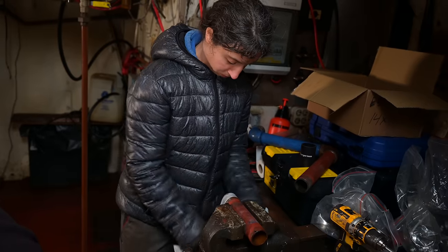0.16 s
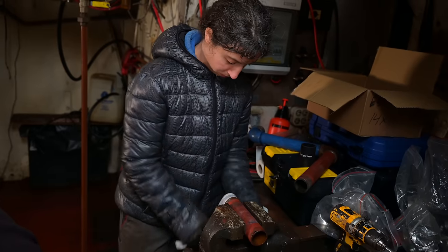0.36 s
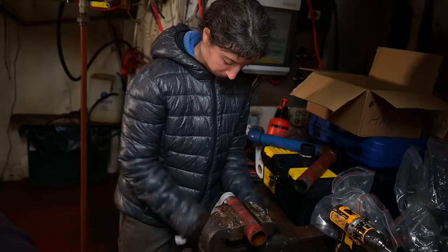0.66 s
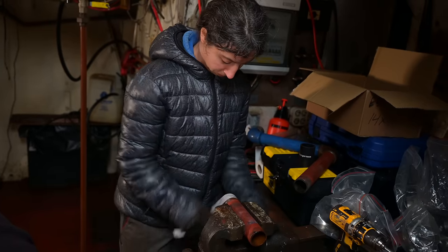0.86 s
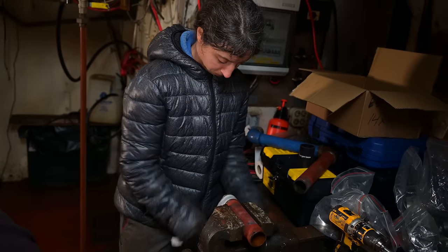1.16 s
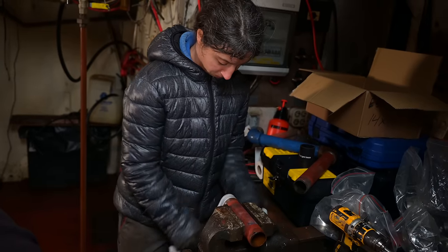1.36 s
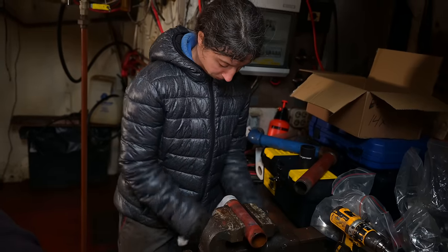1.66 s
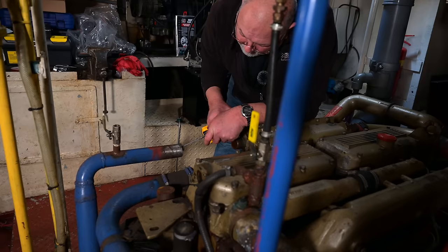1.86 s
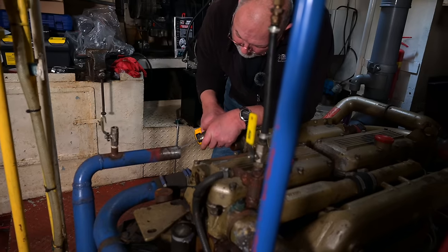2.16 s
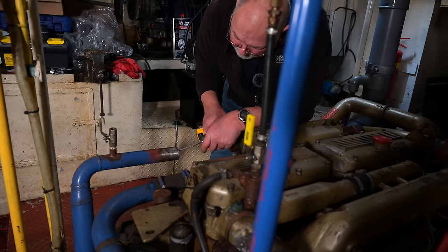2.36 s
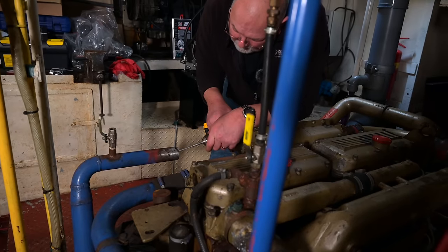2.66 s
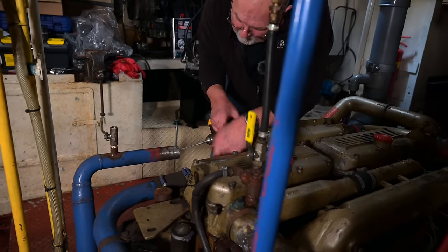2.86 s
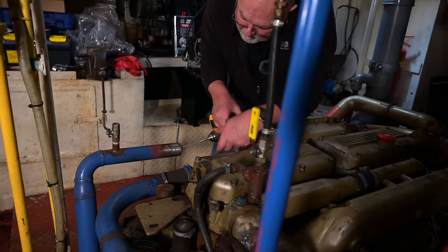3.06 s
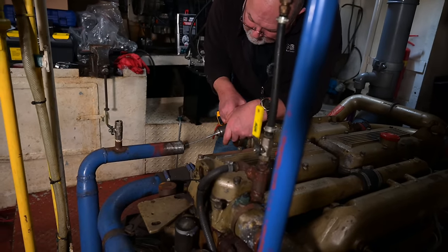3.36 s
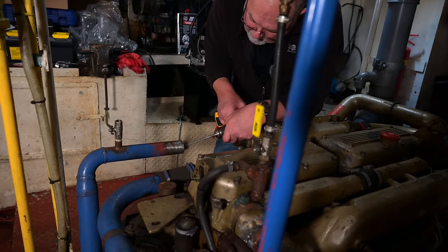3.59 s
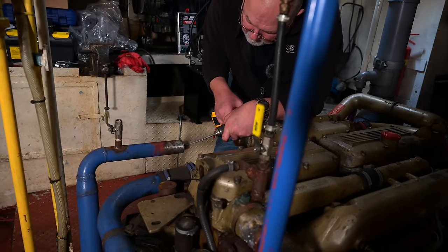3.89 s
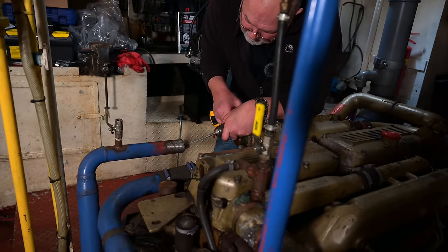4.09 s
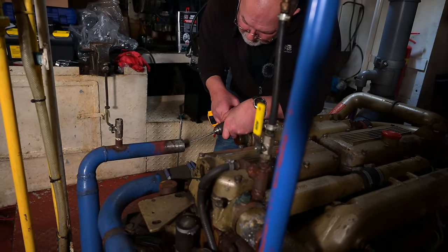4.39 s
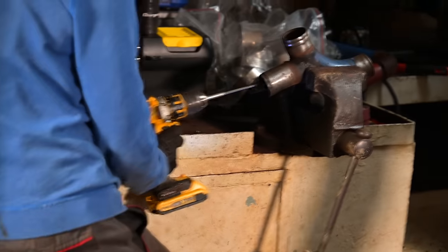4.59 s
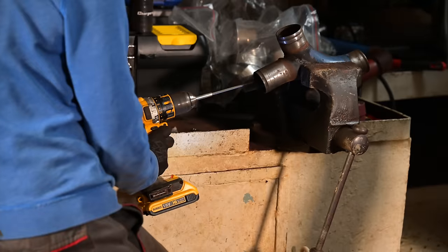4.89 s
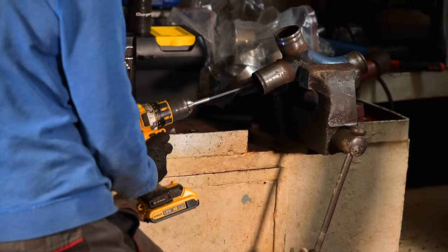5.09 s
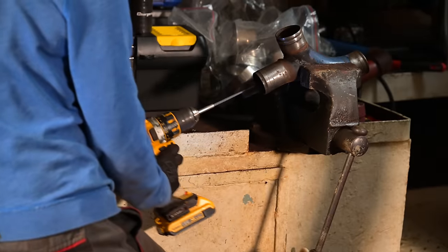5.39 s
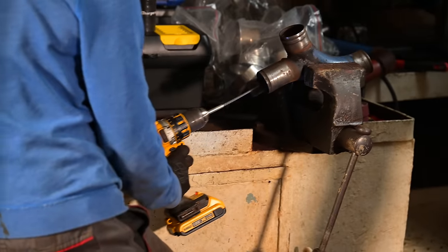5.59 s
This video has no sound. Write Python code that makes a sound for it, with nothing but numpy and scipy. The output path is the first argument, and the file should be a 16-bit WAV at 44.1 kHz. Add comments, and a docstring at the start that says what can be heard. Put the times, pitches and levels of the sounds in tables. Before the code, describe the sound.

From 0 to about 1.8 s, an abrasive pad scours a metal pipe by hand: nine quick, gritty strokes, roughly five a second, each starting and stopping sharply. Some catch with a harder scratch, around 0.3 s especially; the stroke near 0.9 s is brighter. Soft sleeve rustle fills the gaps, with very faint thin squeals and a dull, quiet knock at 0.6 s. At about 1.85 s a cordless drill cuts in, louder, its wire brush hissing brightly inside a pipe, fluttering rapidly with each turn over motor whine and gear rattle. Speed wavers slightly, then sags from 4.2 to 4.6 s as the hiss surges, duller and rougher, peaking near 4.5 s. Gear rattle swells around 4.9 s. The loaded drill drops away by 5.2 s, while a steadier, softer drill, faded in from 4.5 s, whirs on more distantly to the end. Quiet workshop room noise continues throughout, in centred mono.

```python
"""Scrubbing and drilling in a workshop

An abrasive pad scrubs a metal pipe in quick strokes: bursts of shaped noise, with thin squeals and a dull knock.
Then a cordless drill spins a wire brush inside a pipe, slowing under load: tones tied to rotor speed, plus hiss.
It fades into a second, steadier drill further off, made of noise and tones. Room noise lies under everything.
Both channels are the same.
"""
import sys
import numpy as np
from scipy import signal
from scipy.fft import rfft, irfft, next_fast_len
from scipy.io import wavfile
from scipy.ndimage import uniform_filter1d, map_coordinates

SR = 44100
rng = np.random.default_rng(int(sys.argv[2]) if len(sys.argv) > 2 else 0)


def log_audio(samples):
    """Write samples as a 16-bit WAV file to the path given in sys.argv[1]."""
    # one column per channel
    frames = np.atleast_2d(samples).T
    # limit to full scale, then quantise
    limited = np.clip(frames, -1, 1)
    pcm = np.round(limited * 32767).astype(np.int16)
    wavfile.write(sys.argv[1], SR, pcm)


N = 253134  # length in samples
T = np.arange(N) / SR  # time of each sample, s
GEARING = 12.57  # rotor turns per chuck turn, in both drills


def amp(db):
    """Turn decibels into a plain multiplier."""
    return 10 ** (np.asarray(db) / 20)


def unit(x):
    """Scale a sound to an rms level of 1."""
    return x / np.sqrt(np.mean(x ** 2) + 1e-20)


def along(points, hz):
    """Read a curve of (Hz, value) points, joined by straight lines on a log pitch axis."""
    f, v = np.transpose(points)
    return np.interp(np.log(hz + 1), np.log(f + 1), v)


def curves(rows, t=T):
    """Read a table over time: one curve for each column after the first."""
    s, *cols = np.transpose(rows)
    return [np.interp(t, s, c) for c in cols]


def gate(rows, fade):
    """1 while a table lasts, fading to 0 at its ends over `fade` seconds."""
    return np.clip(np.minimum(T - rows[0][0], rows[-1][0] - T) / fade, 0, 1)


def swell(s, width, db):
    """A bell-shaped rise (or dip, if db is negative) around time s."""
    return db * np.exp(-((T - s) / width) ** 2)


def wobble(rate):
    """A smooth random curve through `rate` random points a second."""
    return map_coordinates(rng.standard_normal(int(N * rate / SR) + 4), [T * rate])


def shaped(x, gain_db, patchy_db):
    """Filter x by a gain that varies with pitch and time, keep each moment's power, then add random patches."""
    hz, t, z = signal.stft(x, SR, nperseg=256)
    patches = uniform_filter1d(rng.standard_normal(z.shape), 3, 0)
    patches = uniform_filter1d(patches, 24, 1)
    gain = amp(gain_db(hz[:, None], t)) * np.ones(z.shape)
    gain = gain / np.sqrt(np.mean(gain ** 2, axis=0))
    z = z * gain * amp(patchy_db * unit(patches))
    return unit(signal.istft(z, SR, nperseg=256)[1][:N])


def coloured(x, response):
    """Filter x by a fixed response over frequency."""
    m = next_fast_len(N + 8192)
    return irfft(rfft(x, m) * response(np.fft.rfftfreq(m, 1 / SR)), m)[:N]


def grit(spread_db):
    """Dense scratches of unequal size: noise whose level jitters quickly."""
    return unit(rng.standard_normal(N) * amp(spread_db * wobble(900)))


def tone(hz, blur_hz):
    """A sine of rms 1 whose pitch trembles."""
    trembling_hz = hz + blur_hz * wobble(60)
    phase = 2 * np.pi * np.cumsum(trembling_hz) / SR
    return np.sqrt(2) * np.sin(phase + rng.uniform(0, 2 * np.pi))


# Hand strokes, before a random tremble in level: start_s, end_s, starting_level_db, loudest_s, loudest_level_db,
# closing_level_db, brightness_db, sleeve_rustle_after_db
HAND_STROKES = [(.075, .197, -44.5, .17, -38, -40, -4.5, -58.5),
                (0.266, .421, -49, .35, -36, -46.5, -2.5, -53),
                (.501, .605, -44.5, .57, -35, -40.5, 1.5, -50), (0.67, 0.817, -45, .77, -37, -52, -.5, -60),
                (0.877, .988, -47.5, .93, -34, -33.5, 6.5, -54),
                (1.06, 1.184, -39.5, 1.11, -37, -36.5, -1.5, -54.5),
                (1.237, 1.378, -53, 1.3, -34.5, -37.5, 2, -50.5),
                (1.433, 1.564, -39.5, 1.55, -36, -36.5, -4.5, -46),
                (1.63, 1.779, -53, 1.68, -35.5, -37, 1, -50)]
# Moments when the pad catches on the pipe: start_s, length_s, level_db
PAD_CATCHES = [(0.307, 0.011, -34.5), (0.323, 0.013, -29.5), (.5, .004, -38), (0.711, 0.021, -34.5),
               (0.97, 0.015, -43), (1.11, 0.029, -35.5), (1.156, 0.0075, -38)]
# Basic colour of the pad's grit: pitch_hz, relative_level_db (per Hz)
PAD_COLOUR = [(410, -31.5), (700, -25), (1180, -18), (1840, -17), (2990, -9), (3780, -4.5), (4140, -8.5),
              (7850, -2), (13800, -5), (15900, -12.5)]
# Low rasp of the pad: it grows with time and weakens as a stroke gets brighter
RASP_DB, RASP_GROWS_DB_PER_S, RASP_PER_BRIGHTNESS = 0, 2.5, -0.33
FIRST_RUSTLE_DB, SLEEVE_ENDS_S = -49.5, 1.85


def scrubbing():
    """Grit of the pad rasps along the pipe, starting and stopping sharply; where it catches the rasp jumps."""
    _, end, _, top, _, _, bright_db, rustle_db = np.transpose(HAND_STROKES)

    def colour(hz, t):
        high = np.clip(np.log2((hz + 1) / 7000), 0, 1)
        low = np.clip(np.log2(3500 / (hz + 1)), 0, 1)
        bright = np.interp(t, top, bright_db)
        rasp_db = RASP_DB + RASP_GROWS_DB_PER_S * t + RASP_PER_BRIGHTNESS * bright
        return along(PAD_COLOUR, hz) + high * bright + low * rasp_db

    def cloth(hz, t):
        # the pad's colour, losing 3 dB more per octave above 1500 Hz
        return along(PAD_COLOUR, hz) - 3 * np.log2(np.maximum(hz, 1500) / 4000)

    level = np.zeros(N)
    for start_s, end_s, start_db, top_s, top_db, close_db, _, _ in HAND_STROKES:
        pressure = amp(np.interp(T, (start_s, top_s, end_s), (start_db, top_db, close_db)))
        onset = np.clip((T - start_s) / 0.0055, 0, 1)
        release = amp(-60 * np.maximum(T - end_s, 0) / 0.068)
        level += pressure * onset * release
    level = level * amp(0.72 * wobble(69.7))
    for s, length, db in PAD_CATCHES:
        catch = np.clip(np.minimum((T - s) / 0.0041, (s + length - T) / 0.0011), 0, 1)
        level = level + amp(db) * catch

    sleeve_db = np.interp(T, np.r_[0, end + .04], np.r_[FIRST_RUSTLE_DB, rustle_db])
    rustle = amp(sleeve_db + 1.3 * wobble(40.8)) * np.clip((SLEEVE_ENDS_S - T) / 0.057, 0, 1)
    rasp = level * shaped(grit(2.1), colour, patchy_db=1.9)
    return rasp + rustle * shaped(grit(1.2), cloth, patchy_db=1.2)


# Speed and whine of the loaded drill: time_s, rotor_hz (turns per second), whine_db (8th order, before a tremble)
ROTOR_SPEED = [(1.78, 405.6, -43), (1.9, 400.2, -42), (2.1, 393, -43), (2.25, 402.2, -47.5),
               (2.45, 407, -45.5), (2.75, 394.2, -38), (2.92, 386, -51), (3.08, 397.6, -51),
               (3.3, 401, -42), (3.6, 402.9, -40.5), (3.78, 389.1, -38.5), (4.06, 402.3, -41),
               (4.2, 394.3, -40.5), (4.45, 368.5, -44.5), (4.63, 347.7, -47.5), (4.78, 360.4, -45.5),
               (4.95, 375.4, -48), (5.2, 366, -50)]
# Wire brush on the wall: time_s, hiss_db (before a 1.5 dB boost and the throb), bright_resonance_hz
WIRE_BRUSH = [(1.78, -42, 6700), (1.94, -31.5, 6890), (2.3, -32, 7200), (2.6, -33, 7300),
              (2.85, -33.5, 6070), (3.04, -36, 6500), (3.5, -32.5, 7300), (4.05, -32.5, 6850),
              (4.28, -32, 6290), (4.34, -30.5, 5430), (4.47, -27.5, 5470), (4.62, -31, 5480),
              (4.9, -32, 5600), (5.08, -39, 5784), (5.17, -46, 5810)]
# Basic colour of the bristle hiss: pitch_hz, relative_level_db (per Hz)
BRISTLE_COLOUR = [(60, -73), (200, -18.5), (500, -10.5), (850, -13), (1250, -6.5), (1800, -7), (2200, -6),
                  (3600, -2.5), (5300, -3.5), (6300, -1.5), (7500, -0.5), (9200, -7), (11200, -8.5),
                  (12800, -9), (15900, -12)]
# Resonances of the air column in the pipe: pitch_hz, width_hz, relative_level_db
PIPE_AIR = [(1377, 140, 0), (2150, 230, -3)]
# Chuck tones: multiple (of the chuck's turning rate), level_db (over the shake level, before a tremble)
CHUCK_ORDERS = [(3, -18), (4, -3), (5, 0), (6, -2)]
# Higher rotor tones: multiple (of rotor_hz), level_db (over the whine, before a tremble)
HIGH_ROTOR_ORDERS = [(16, -9), (21, -12)]
# Further overtones of the gear mesh. Key: multiple; values: level_db (over the 3rd, before a tremble), blur_hz
MESH_OVERTONES = {2: (-7.5, 60), 4: (-0.5, 160), 5: (-7, 210)}
# Changes in the gear rattle: time_s, width_s, mesh_gain_db, third_overtone_gain_db
GEAR_RATTLES = [(2.03, .27, 4, 9.5), (3.55, .35, -2, 5.5), (4.86, .34, 16.5, 9)]
# The chuck shakes the pipe harder or less: time_s, width_s, gain_db
CHUCK_SHUDDERS = [(3.1, 0.23, 8), (3.9, .3, 5), (4.9, .4, -8)]
MESH = 3.77  # gear teeth meeting per rotor turn
PRESS_AT = 4.891  # one of the once-per-turn presses peaks near this moment, s; it sets the timing of the others
FADE_IN_S, RISE_DB_PER_S, FADE_OUT_S, FALL_DB_PER_S = 1.87, 110, 5.07, 130  # for the drill's tones and drone
HUM_DB, HUM_GROWS_DB_PER_S = -58, 1.6  # hum level at the fade-in time, and its growth
FOURTH_DB, MESH_DB, THIRD_DB = -53, -57.5, -53  # base levels: 4th rotor order, gear mesh, its 3rd overtone
# Lift of the bright resonance: it grows with the hiss and jumps once the brush is deep in
LIFT_DB, LIFT_PER_DB, DEEP_S, DEEP_LIFT_DB, DEEP_FALLS_DB_PER_S = 3, 1.1, 4.31, 8, 4
TREBLE_DB, TREBLE_PER_DB, TREBLE_FALLS_DB_PER_S = 3, 0.67, 1.4
DRONE_DB, DRONE_GROWS_DB_PER_S = -50, 2  # base level at the fade-in time, and its growth
SHAKE_DB = -71  # base level of the chuck tones


def loaded_drill():
    """Rotor and gear tones follow the speed; the off-centre brush presses the wall once per chuck turn."""
    hz, whine_db = curves(ROTOR_SPEED)
    hiss_db, _ = curves(WIRE_BRUSH)
    since = T - FADE_IN_S
    fade = amp(RISE_DB_PER_S * np.minimum(since, 0) - FALL_DB_PER_S * np.maximum(T - FADE_OUT_S, 0))
    turn = 2 * np.pi * np.cumsum(hz / GEARING) / SR
    press = np.cos(turn - turn[round(PRESS_AT * SR)] + .25 * wobble(9.5))
    bite = unit(amp(9.9 * press))  # the teeth load up in a short burst each turn

    def colour(f, t):
        level_db, centre_hz = curves(WIRE_BRUSH, t)
        force_db = np.maximum(level_db + 33, -4)
        deep = np.clip((t - DEEP_S) / .03, 0, 1)
        deep_db = (DEEP_LIFT_DB - DEEP_FALLS_DB_PER_S * (t - DEEP_S)) * deep
        lift_db = LIFT_DB + LIFT_PER_DB * force_db + deep_db
        resonance = np.exp(-((f - centre_hz) / 650) ** 2)
        treble_db = TREBLE_DB + TREBLE_PER_DB * force_db - TREBLE_FALLS_DB_PER_S * (t - FADE_IN_S)
        high = np.clip(np.log2((f + 1) / 7000), 0, 1)
        return along(BRISTLE_COLOUR, f) + lift_db * resonance + treble_db * high

    def column(f):
        return sum(amp(db) * 1j * f * w / (c * c - f * f + 1j * f * w) for c, w, db in PIPE_AIR)

    # the hiss throbs with each press, more strongly around the last rattle
    throb_db = (0.7 + swell(GEAR_RATTLES[-1][0], .3, 1.2)) * press
    hiss = amp(hiss_db + 1.5 + throb_db) * shaped(grit(1.18), colour, patchy_db=1.6)
    drone_db = DRONE_DB + DRONE_GROWS_DB_PER_S * since + 1.4 * wobble(3.14) + 2.6 * press
    drone = amp(drone_db) * unit(coloured(grit(1.0), column))

    hum_db = HUM_DB + HUM_GROWS_DB_PER_S * since + 1.4 * wobble(5)
    fourth_db = FOURTH_DB + 3.2 * wobble(12) + 8 * np.minimum(since - .3, 0)  # rises at first, then holds
    tones = amp(hum_db) * tone(hz, 1.83) + amp(fourth_db) * tone(4 * hz, 16.1)
    tones += amp(whine_db + 1.3 * wobble(30.08)) * tone(8 * hz, 9.18)
    for k, db in HIGH_ROTOR_ORDERS:
        tones += amp(whine_db + db + 2.94 * wobble(6)) * tone(k * hz, 23.45)
    shake_db = SHAKE_DB + sum(swell(*row) for row in CHUCK_SHUDDERS)
    for k, db in CHUCK_ORDERS:
        tones += amp(shake_db + db + 1.8 * wobble(5)) * tone(k * hz / GEARING, 1.2)

    mesh_db = MESH_DB + sum(swell(s, width, db) for s, width, db, _ in GEAR_RATTLES) + 1.2 * wobble(25)
    third_db = THIRD_DB + sum(swell(s, width, db) for s, width, _, db in GEAR_RATTLES)
    gears = amp(mesh_db + 2.6 * wobble(90)) * tone(MESH * hz, 13.9)
    gears += amp(third_db + 1.8 * wobble(250)) * tone(3 * MESH * hz, 35)
    for k, (db, blur_hz) in MESH_OVERTONES.items():
        gears += amp(third_db + db + 3.5 * wobble(200)) * tone(k * MESH * hz, blur_hz)
    machine = drone + tones + bite * gears
    return gate(WIRE_BRUSH, 0.077) * hiss + gate(ROTOR_SPEED, 0.04) * fade * machine


# The steadier drill: time_s, rotor_hz (turns per second), noise_db (before a throb), hum_db, whine_db (8th order)
STEADY_SPEED = [(4.5, 402, -62, -68, -56), (4.75, 400.3, -42, -49.5, -42.5), (5.2, 403.3, -42, -55, -41),
                (5.42, 405.6, -41.5, -55, -57.5), (5.6, 402, -41, -53, -45), (5.74, 399.5, -41, -57, -41)]
# Its other tones: multiple (of rotor_hz), level_db (before the fade-in, a tremble and a throb)
STEADY_TONES = [(1 / GEARING * 2, -75), (4, -62), (21, -62), (31, -57)]
# Colour of its motor and gear noise: pitch_hz, relative_level_db (per Hz)
WHIRR_COLOUR = [(40, -44), (130, -20), (250, -22.5), (350, -12), (570, -8.5), (730, -10.5), (1600, -11),
                (2500, -7.5), (4200, -13), (6600, -9.5), (8500, -12.5), (10500, -17), (12700, -17.5),
                (15900, -22)]


def steady_drill():
    """A lighter load: nearly even speed, with clear rotor tones over motor and gear noise."""
    hz, noise_db, hum_db, whine_db = curves(STEADY_SPEED)
    start_s = STEADY_SPEED[0][0]
    throb = 0.5 * np.cos(2 * np.pi * np.cumsum(hz / GEARING) / SR)  # dB, once per chuck turn
    patchy_noise = shaped(grit(0.79), lambda f, t: 0, patchy_db=1.0)
    whirr = unit(coloured(patchy_noise, lambda f: amp(along(WHIRR_COLOUR, f))))
    orders = np.zeros(N)
    for k, db in STEADY_TONES:
        orders += amp(db + 3.4 * wobble(25) + 2.9 * throb) * tone(k * hz, 2.6 * k)
    entry = np.clip((T - start_s) / .7, 0, 1) ** 2
    lines = amp(hum_db) * tone(hz, 1.14) + amp(whine_db) * tone(8 * hz, 4.99)
    return (T > start_s) * (amp(noise_db + throb) * whirr + lines) + entry * orders


# Faint notes under the strokes, before a tremble: start_s, end_s, pitch_hz, level_db
FAINT_SQUEALS = [(.2, .52, 1740, -69), (1.0, 1.45, 1160, -67.5)]


def squeals():
    """Thin, wavering notes that swell and fade."""
    out = np.zeros(N)
    for start, end, hz, db in FAINT_SQUEALS:
        swelling = np.sin(np.pi * np.clip((T - start) / (end - start), 0, 1)) ** .25
        out += amp(db + 3 * wobble(60)) * swelling * tone(hz, 30)
    return out


# The pipe knocks in the vice: time_s, level_db (scales the ringing below)
PIPE_KNOCKS = [(.6, -52.5)]
# Ringing of the vice and bench: pitch_hz, relative_level_db (before a random change), fall_by_60_db_s
VICE_RINGING = [(242, -7, 0.92), (390, -2, 0.069), (326, -7, 0.093)]


def knocks():
    """A dull blow rings the vice and bench: sines that die away at their own rates."""
    out, t = np.zeros(N + SR), T[:SR // 2]
    for s, db in PIPE_KNOCKS:
        ring = np.zeros(len(t))
        for hz, level, t60 in VICE_RINGING:
            ring_db = level + rng.normal(0, 0.97) - 60 * t / t60
            ring += amp(ring_db) * np.sin(2 * np.pi * hz * t)
        onset = 1 - np.exp(-t / 0.0032)
        out[round(s * SR):][:len(t)] += amp(db) * ring * onset
    return out[:N]


# Colour of the room tone: pitch_hz, relative_level_db (per Hz)
ROOM_COLOUR = [(24, -63), (40, -31), (249, 2.5), (938, -8), (2140, -6.5), (2900, -12), (7130, -5.5),
               (14400, -12.5), (15900, -9.5)]


def room_tone():
    """The quiet workshop: filtered noise whose level drifts slowly."""
    noise = coloured(rng.standard_normal(N), lambda f: amp(along(ROOM_COLOUR, f)))
    return amp(-59 + 0.75 * wobble(3.9)) * unit(noise)


def scene():
    """Add all the sources and send the same mix to both channels."""
    mono = scrubbing() + loaded_drill() + steady_drill() + squeals() + knocks() + room_tone()
    return np.array([mono, mono])


TOP_HZ = 15830  # band limit


def record(dry):
    """The microphone loses the deep bass; nothing above the band limit is kept."""
    def microphone(hz):
        return (hz < TOP_HZ) / np.sqrt(1 + (75 / (hz + 1)) ** 6)
    return np.array([coloured(x, microphone) for x in dry])


dry = scene()
out = record(dry)
log_audio(out)
```